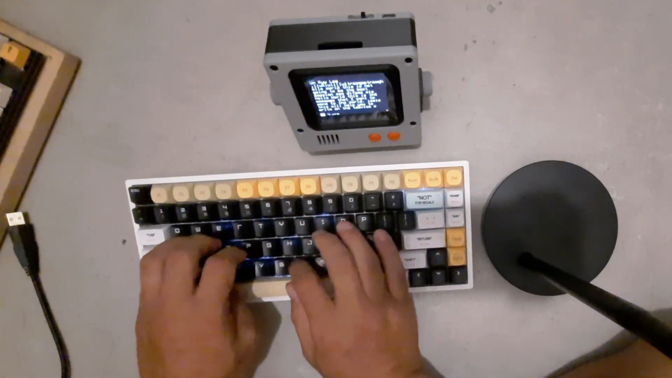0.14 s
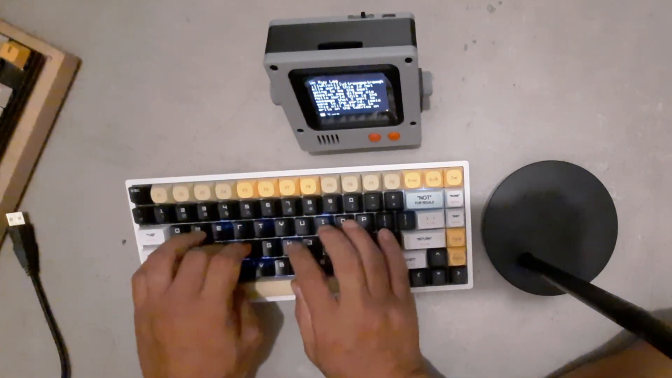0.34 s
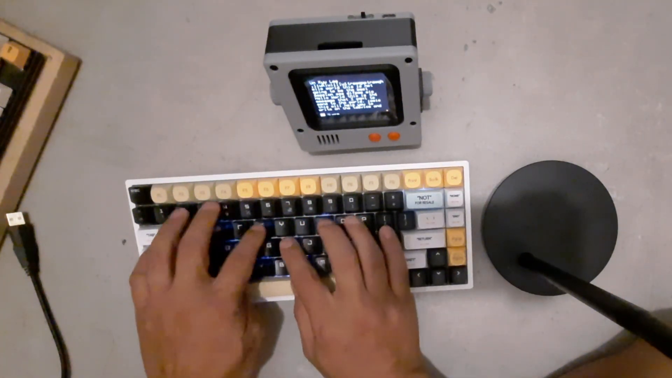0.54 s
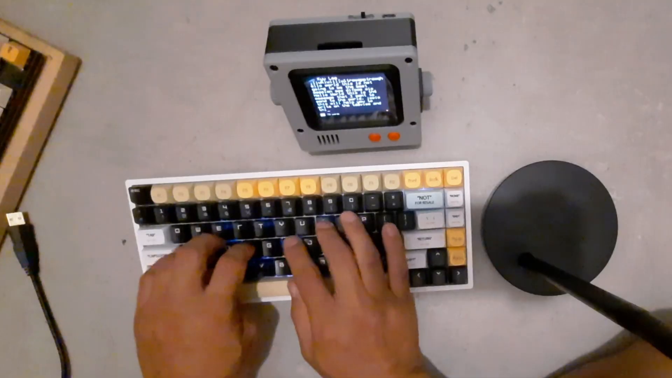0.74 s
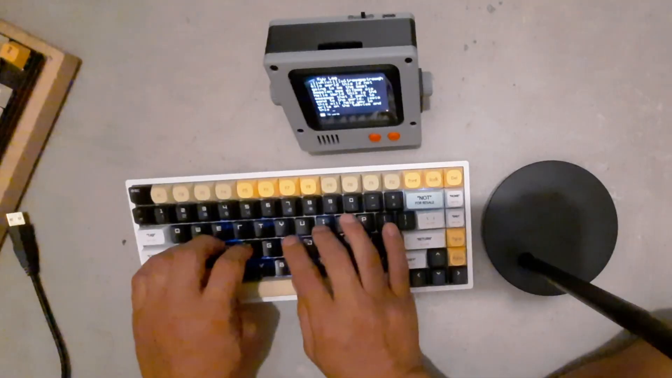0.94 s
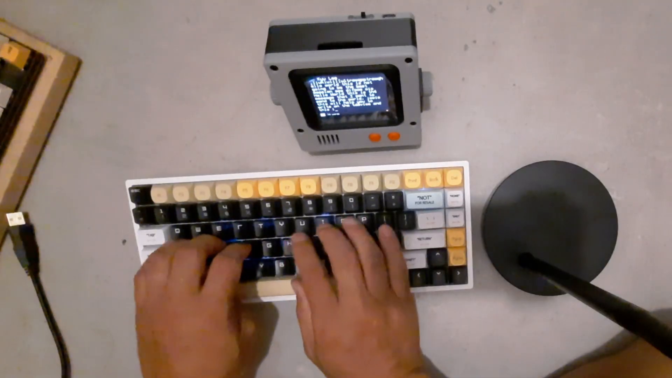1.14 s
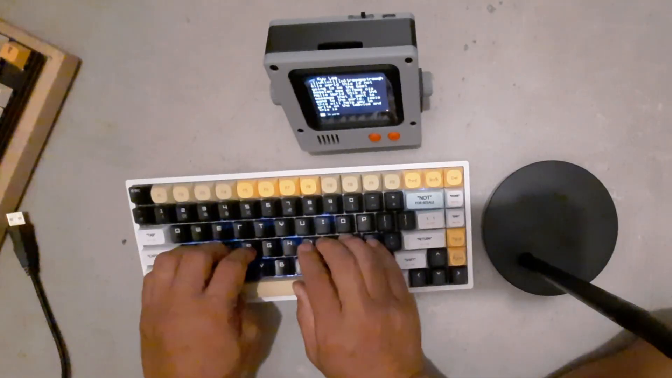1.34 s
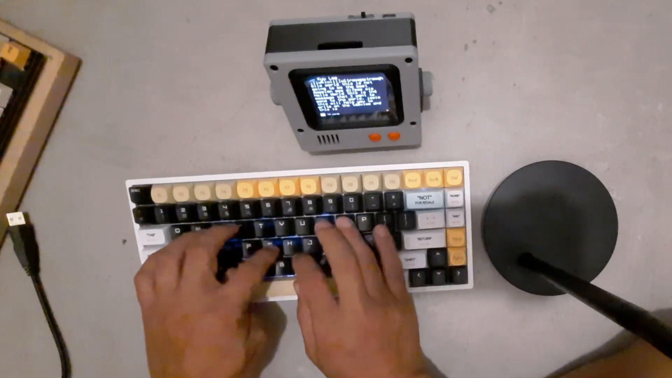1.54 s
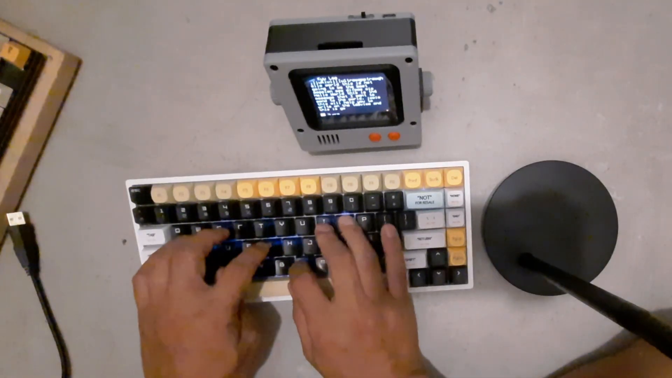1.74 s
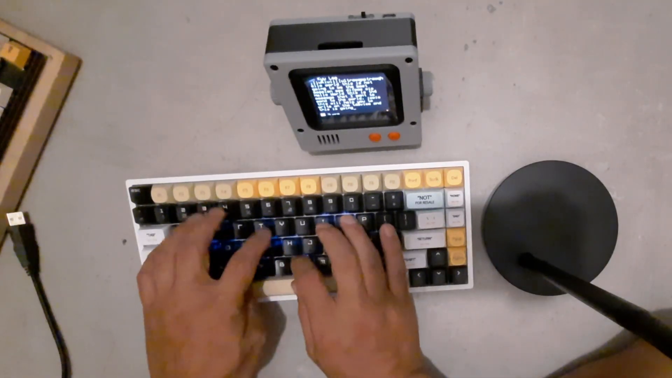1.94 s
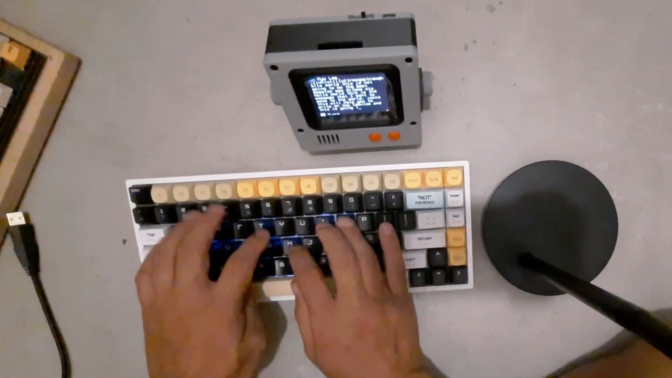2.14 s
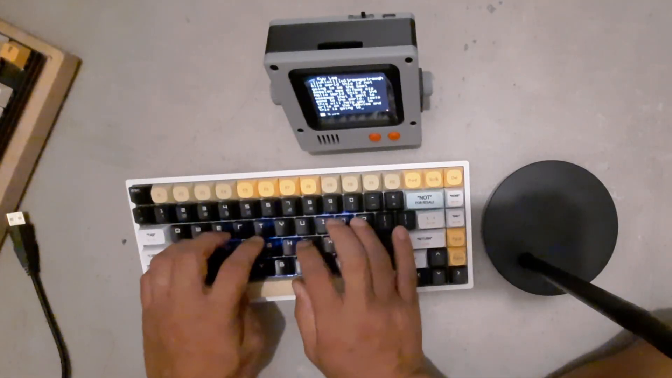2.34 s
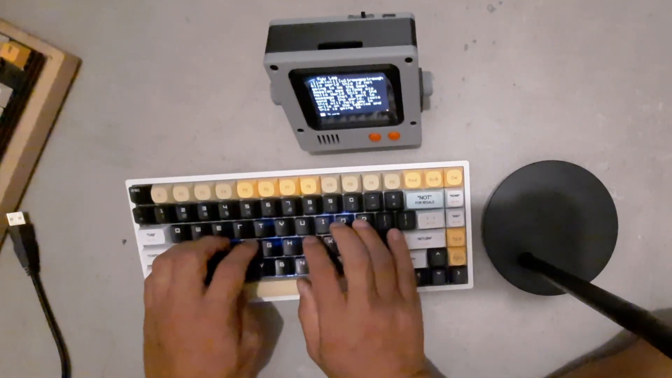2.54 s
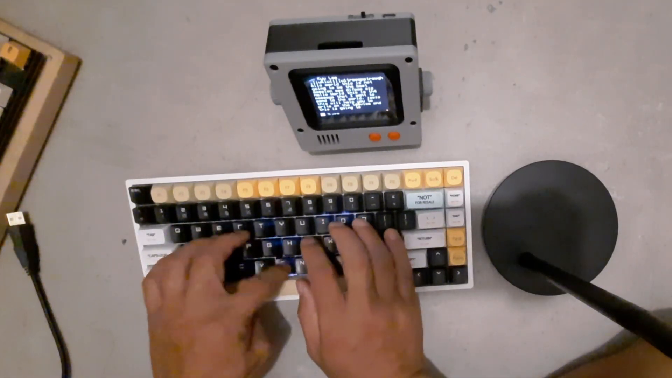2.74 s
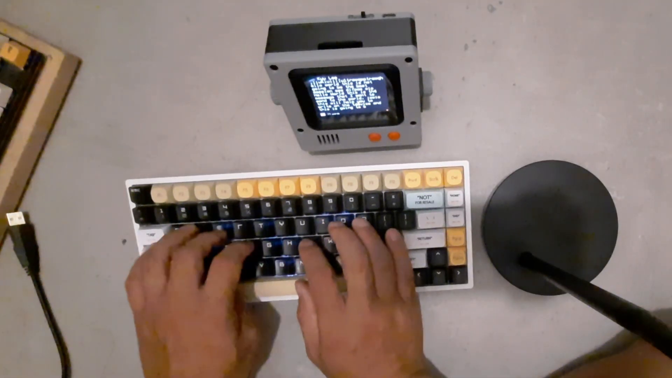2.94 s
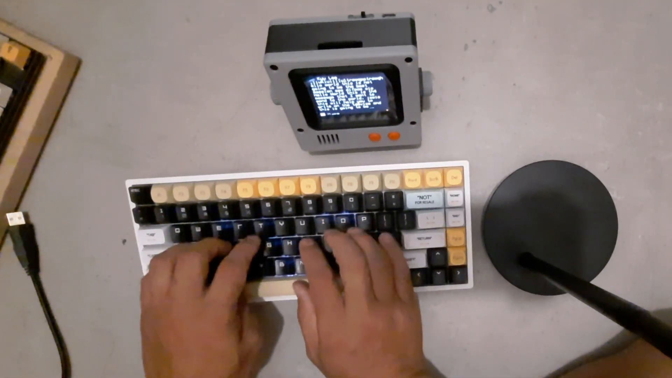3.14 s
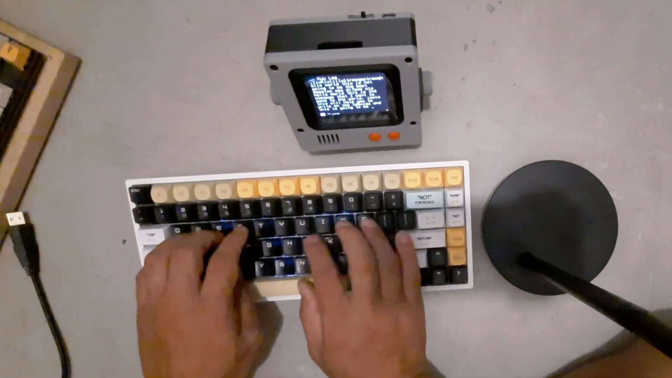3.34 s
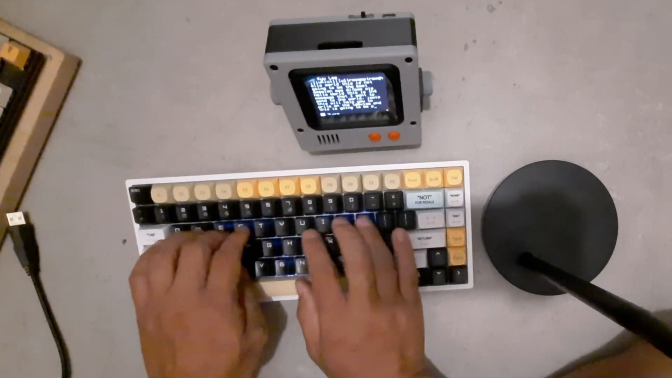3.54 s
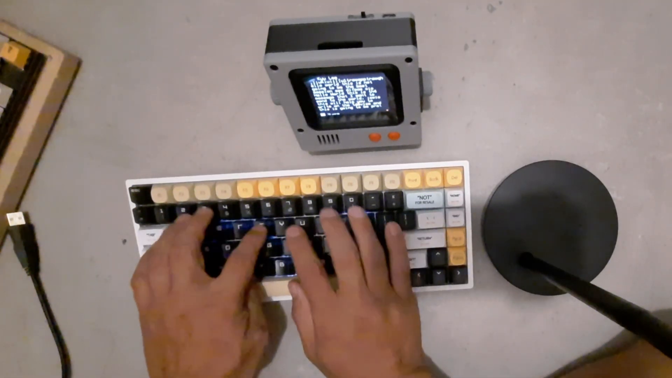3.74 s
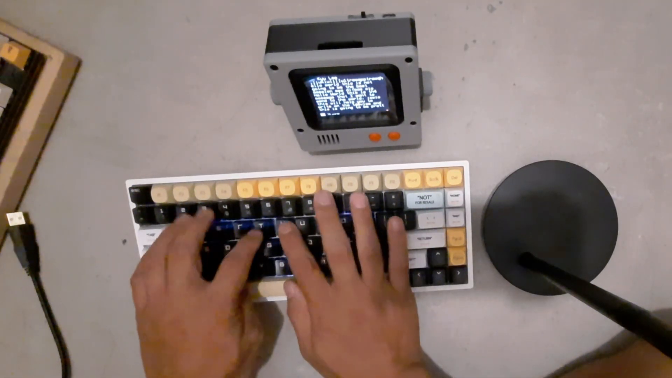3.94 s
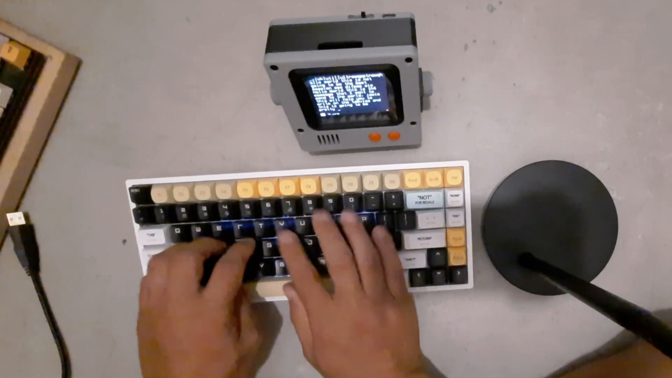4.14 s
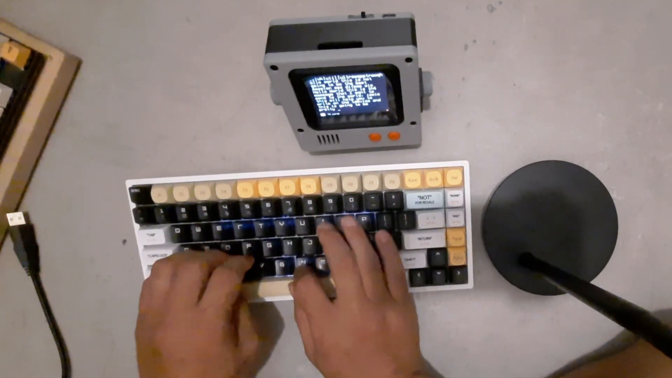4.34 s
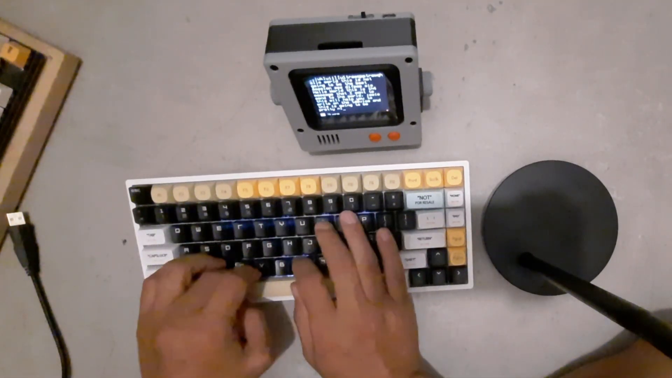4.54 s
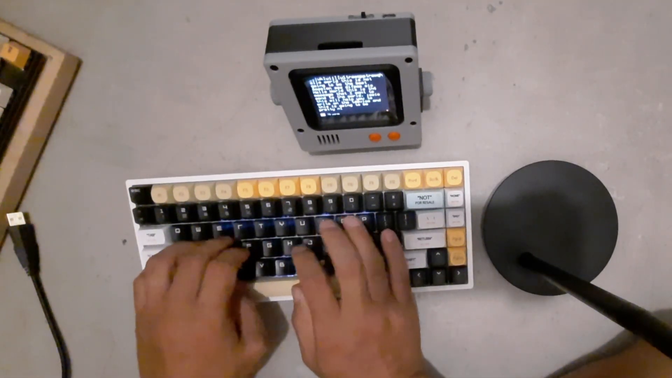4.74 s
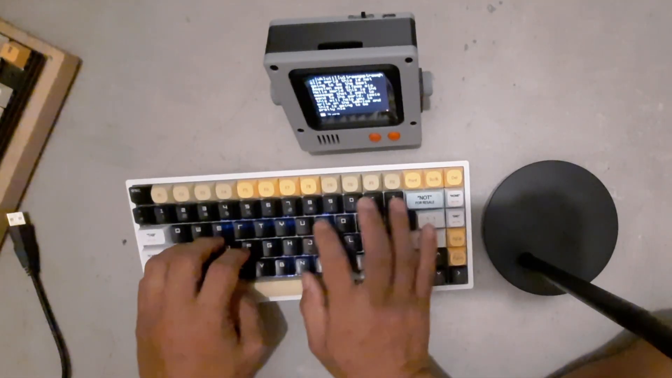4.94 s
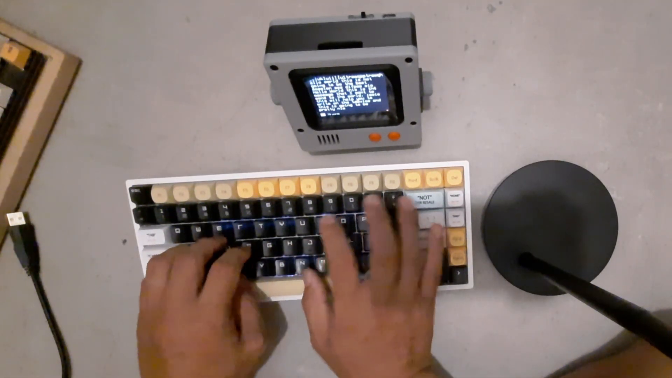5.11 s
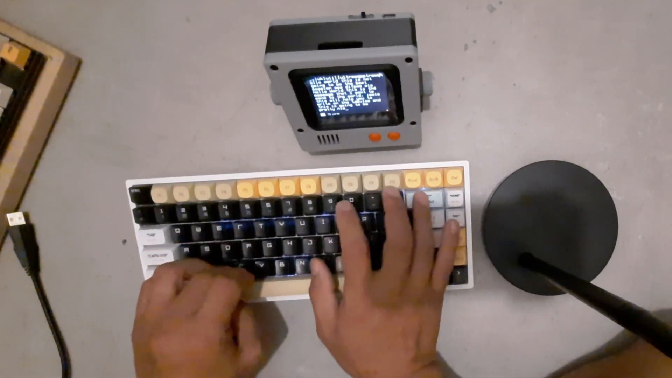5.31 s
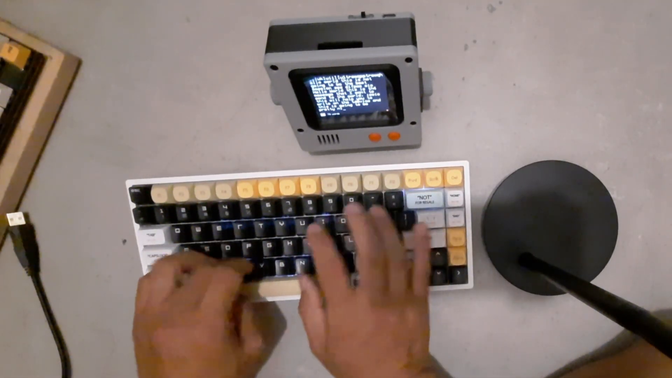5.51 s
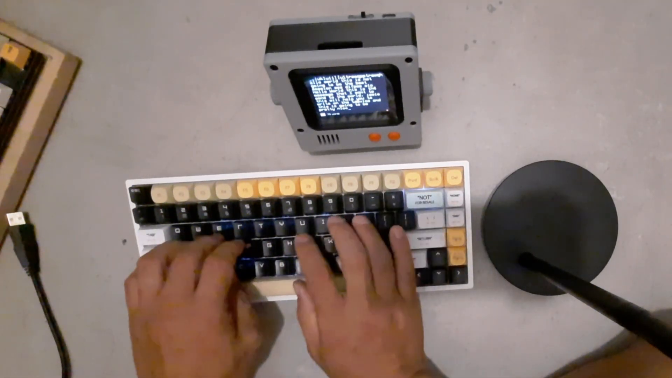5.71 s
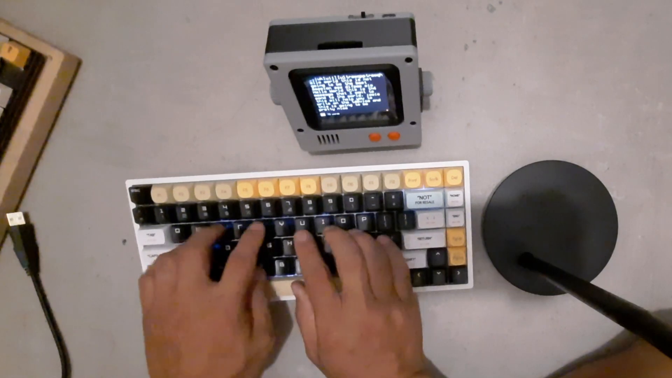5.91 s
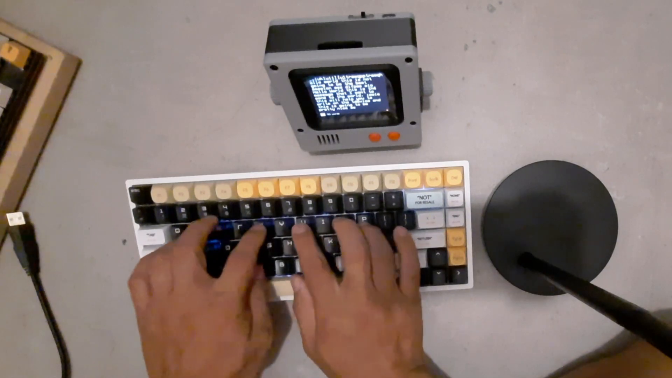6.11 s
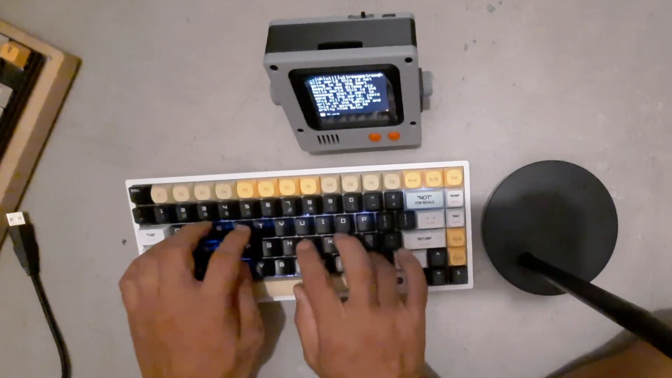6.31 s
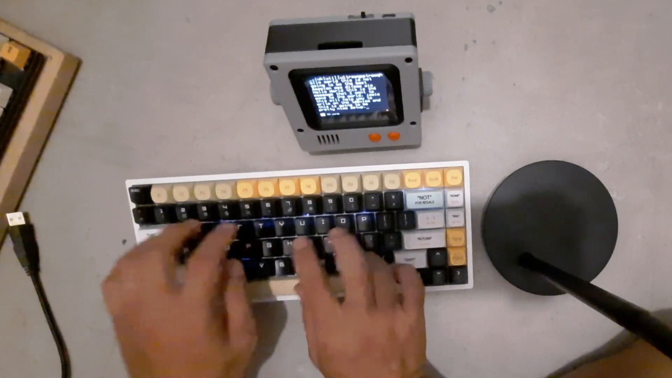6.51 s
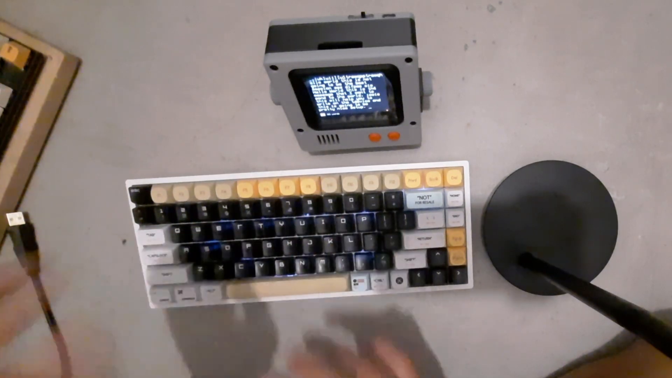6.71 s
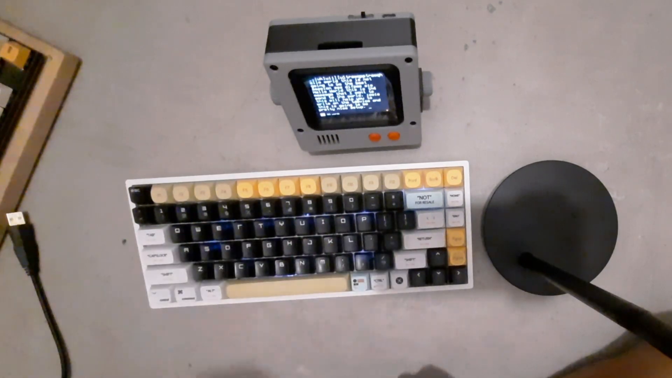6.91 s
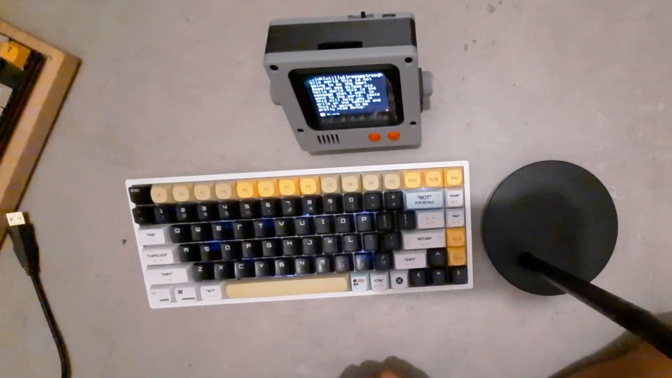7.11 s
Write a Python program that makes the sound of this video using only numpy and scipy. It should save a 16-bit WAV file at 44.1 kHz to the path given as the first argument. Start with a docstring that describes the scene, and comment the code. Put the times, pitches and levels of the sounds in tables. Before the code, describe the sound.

Close, left-leaning stereo sound of quick typing in a quiet, hard-surfaced room. Irregular key presses and releases rattle along, light ticks alternating with full desk-thumping clacks that have a slight metallic ring and a short reverberant tail. Several brief hesitations interrupt the flow, with soft hollow bumps and a barely audible thin squeak. After one last loud stroke only low rumble and soft hiss remain, before a small treble snap.

```python
"""Fast typing on a mechanical keyboard on a hard desk runs through most of the scene, in a bare, quiet room over
faint rumble and hiss. Each key contact is a noise burst of a few milliseconds that excites the resonances of desk,
case, plate and cap; the room answers with a long tail of decaying noise. Amid the typing a thin high squeak, a
wavering frequency sweep, sounds twice, and dull knocks ring hollow modes; a small bright click ends the scene.
The left microphone port is the louder."""
import sys
import numpy as np
from scipy import signal
from scipy.fft import rfft, irfft, next_fast_len
from scipy.io import wavfile
from scipy.ndimage import uniform_filter1d

SR = 44100
rng = np.random.default_rng(int(sys.argv[2]) if len(sys.argv) > 2 else 0)


def master_out(mix):
    """Clip the mix to full scale and print it as 16-bit PCM to the path in sys.argv[1]."""
    frames = np.transpose(np.atleast_2d(mix))
    ceiling = np.clip(frames, -1, 1)
    pcm = np.round(ceiling * 32767).astype(np.int16)
    wavfile.write(sys.argv[1], SR, pcm)


N = 320161  # length in samples

# Key contacts. Each row: start in seconds, reference level in dB, weight from 0 (light small key) to 1 (long key),
# then, relative to the blow, sharpness of the snap in dB and ring of plate and wire in dB.
KEYS = [(.002, -32.5, 0.77, -6.5, -2), (0.0165, -24, 0.74, -13.5, -2), (0.1172, -31, .9, -11.5, -2.5),
        (.1456, -35, 0.3, -4, -2), (0.238, -40.5, 0, -8, -18.5), (0.2495, -31.5, 0.06, -4.5, -1),
        (0.3427, -31, .35, -7, -7), (0.3532, -30, 0.02, -5.5, -3.5), (0.4473, -28, 0.87, -12.5, -3.5),
        (0.4502, -33, 0.9, -28, -0.5), (.562, -31, 0.88, -10.5, -4), (0.5717, -31.5, 0, -2, 1.5),
        (0.6516, -27.5, 0.27, -6, -9), (0.6552, -37, .2, -4.5, -13), (0.7406, -32, 0.18, -2.5, 0.5),
        (0.7953, -31, 0.3, -10.5, -16), (0.8134, -33.5, 0, -7, -3.5), (0.8555, -35.5, 0.5, -9, -11),
        (0.8976, -34.5, 0.26, -3.5, -7), (0.9243, -27.5, 0.92, -14.5, 1), (0.9893, -34.5, 0.55, -9, -22),
        (1.0163, -36.5, 0.3, -2.5, -2), (1.0469, -25.5, 0.84, -12.5, -6), (1.0803, -39, 0.1, -10, -19),
        (1.0968, -29.5, 0, -6.5, -7), (1.1176, -32, 0.48, -2.5, -8), (1.1854, -32, 0.4, -7.5, -7),
        (1.225, -26.5, 0.77, -15.5, -4.5), (1.3099, -28.5, 0.89, -12.5, -3), (1.5554, -41, 0.53, -10, -17),
        (1.5762, -33, 0.07, -6.5, -10), (1.6516, -30.5, 0.42, -5, -9.5), (1.714, -36, 0.4, -5.5, -4),
        (1.7636, -45.5, 0.3, -8, -2.5), (1.7873, -33, 0, -5, -8.5), (1.8604, -37.5, 0.56, -5, -4.5),
        (1.897, -29, 0, -3.5, -9.5), (1.923, -36, 0.34, -13, -2.5), (1.9755, -32, 0.5, -10.5, -5),
        (1.9974, -24.5, 0.81, -15, -2), (2.0929, -29, 0.94, -10, 0), (2.106, -27.5, 0, -3.5, -4),
        (2.1849, -30.5, 0.3, -1.5, -1), (2.1984, -36, 0.15, -6.5, -4), (2.271, -26.5, 0.79, -18, -6.5),
        (2.2938, -41, 0.7, 1, 2), (2.374, -30, 0.81, -13, -3.5), (2.7954, -42.5, 0.66, -12, -8.5),
        (2.873, -36.5, 0.55, -4.5, 0.5), (2.9396, -39, 0.64, -7, -28), (2.957, -30, 0.42, -6, -0.5),
        (3.0432, -36, 0.8, -1.5, -10), (3.0671, -25, 0.82, -13, -2.5), (3.1684, -29, 0.96, -13, -6),
        (3.4432, -58, .95, -8, -25), (3.463, -47, 0, -23, -17), (3.499, -42.5, 0.7, -13, -10),
        (3.5173, -31, 0.25, -7, -6), (3.5616, -33.5, 0.57, -2.5, -14), (3.6105, -30, 0.44, -9.5, -3),
        (3.639, -35.5, 0.44, -7.5, -10), (3.685, -31.5, 0.38, -6, -14.5), (3.7864, -35.5, 0, -4.5, -4.5),
        (3.8502, -35.5, 0.23, -8, -7), (3.9301, -30.5, 0, -6.5, -11.5), (3.9948, -32.5, 0.3, -8, -4.5),
        (4.0886, -42, 0.6, -22, -22.5), (4.1043, -25, 0.82, -15, -0.5), (4.2, -26, 0.86, -10, -0.5),
        (4.3783, -39, 0.04, -10, -6), (4.4043, -30.5, 0.24, -6.5, -3.5), (4.5047, -32, 0.14, -3.5, 1),
        (4.5523, -39, 0.2, -6, -23), (4.5638, -28.5, 0.64, -13, -7.5), (4.6154, -38, 1, -11.5, -10),
        (4.6477, -34, 0.78, -5, -6.5), (4.7484, -46, 0.06, -14, -29), (4.8313, -40, 0.36, -5.5, -1.5),
        (5.3163, -27, 0.66, -14.5, -9), (5.425, -29, 0.94, -8.5, -14), (5.476, -36, 0.03, -8.5, -5.5),
        (5.6003, -37.5, 0.76, -16, -9), (5.6103, -43.5, 0.54, -1, -5), (5.6901, -32.5, 0, -3.5, -0.5),
        (5.7959, -35.5, 0.74, -4.5, -8.5), (5.808, -26, 0.76, -12.5, -1), (5.9138, -28.5, 0.88, -12, -3),
        (5.953, -37, 0, -6, -12), (6.002, -49, 1, 1.5, -11), (6.0161, -26.5, 0.35, -7, 0),
        (6.057, -33.5, 0.65, -4, -13), (6.0754, -28.5, 0, -3, -7), (6.114, -30.5, 0.35, -5.5, -4.5),
        (6.1337, -31.5, 0.19, 0, -5), (6.181, -35.5, 0.48, -22, -5.5), (6.2763, -36, 0.4, -5.5, -7),
        (6.3059, -35, 0.55, -8.5, -14), (6.4171, -45, 0.77, -3, -7), (6.4406, -44.5, 0, -21.5, -8.5),
        (6.526, -26, 0.88, -11.5, 2), (6.5443, -50, 0.9, 14, -3.5), (6.6086, -21.5, 0.89, -6, 6.5)]

# Resonances of the keyboard parts. Each row: centre in Hz, width in Hz, relative strength in dB.
CASE = [(1796, 130, 9.5), (1992, 253, 9), (2260, 200, -1)]
CASE_LOW = [(968, 184, -6.5), (1326, 386, 3), (1586, 490, 7.5)]
DESK = [(155, 47, -13.5), (312, 86, -7.5), (384.3, 120, -7.5), (479.6, 80, -2.5), (563.5, 77, -0.5),
        (799, 200, -0.5)]
PLATE = [(2715, 940, 0.0058), (2880, 610, 0.0089)]
WIRE = [(3140, 100, 0), (5280, 700, -31)]  # the steel wire under the long keys
CAP = [(3440, 730, 11.5), (4080, 730, 2), (4730, 1100, -8)]
STEM = [(5550, 2600, 7.5), (7450, 2660, 8), (11600, 710, -12.5), (13300, 2800, -8.5), (15200, 7500, -15)]
SPRING = [(8280, 1100, 0)]  # the loose rattle of the switches

# How strongly each part answers, relative to its drive: (light key dB, long key dB).
CASE_MIX, CASE_LOW_MIX, DESK_MIX = (-2, -7.5), (-5.5, -6.5), (-48.5, -17.5)  # to the blow
WIRE_MIX, PLATE_MIX = (-31.5, 0.85), (0, -0.5)  # to the ring
CAP_MIX, STEM_MIX, SPRING_MIX = (2.6, -7.5), (-10.5, -6), (-11.5, -12)  # to the snap

# Spectrum of the room rumble. Each row: frequency in Hz, relative density in dB per Hz.
RUMBLE_COLOUR = [(12, -49), (20, -18.5), (85, -6), (238, -18), (280, -9.5), (455, -20), (498, -18),
                 (555, -22.5), (1500, -28), (1950, -35), (3300, -120)]
# Slow swelling of the rumble above 250 Hz. Each row: time in seconds, extra level in dB.
RUMBLE_SWELL = [(0, 5), (1.3, 0), (2.6, 5.5), (3.2, 5.5), (3.5, -2.5), (4.4, -1.5), (5.1, 0), (6.6, -3),
                (7.26, -2)]
# Spectrum of the microphone hiss. Each row: frequency in Hz, relative density in dB per Hz.
HISS_COLOUR = [(300, -9), (800, -2), (3000, -2.5), (8000, -6.5), (10000, -9.5), (13000, -7), (15600, -6),
               (16000, -13.5)]
# Stereo balance of rumble and hiss. Each row: frequency in Hz, left over right in dB.
AIR_LEAN = [(60, 9), (240, 6), (950, 11.5), (3770, 2.5), (15000, 5)]

# Squeaks. Each row: start in seconds, length in seconds, rise in seconds, pitch in Hz about which the held
# tone drifts, level in dB before the wavering and the stereo gains.
SQUEAKS = [(2.56, .28, .03, 11600, -80), (3.1, .225, .07, 11850, -79)]
SQUEAK_FALL_S, SQUEAK_EDGE_DB = .052, -6
RISE_HZ_PER_S, DRIFT_HZ_PER_S, FALL_HZ = 18000, 3300, 1500
UNDERTONE = .63  # frequency of the companion tone over that of the squeak

# Dull knocks. Each row: start in seconds, level in dB.
KNOCKS = [(3.192, -56), (3.237, -45.5), (3.278, -54), (3.314, -49.5), (3.36, -60.5), (3.438, -58.5)]
# Hollow modes of the knocks. Each row: centre in Hz, width in Hz, relative strength in dB.
HOLLOW = [(306, 170, -7), (537, 115, 1.5), (765, 260, -3.5)]

# Small bright clicks. Each row: start in seconds, level in dB.
CLICKS = [(7.2023, -65.5), (7.229, -40.5)]
# Treble modes of the clicks. Each row: centre in Hz, width in Hz, relative strength in dB.
SNAP = [(2860, 2500, 3.5), (6800, 5200, 12.5), (7180, 1800, 14.5), (12000, 4000, -8)]

# Reverberation time. Each row: frequency in Hz, time to decay by 60 dB in seconds.
ROOM_T60 = [(150, 0.69), (500, 0.38), (1400, 0.35), (1700, 0.5), (2300, 0.46), (2900, 0.55), (3150, 0.55),
            (3500, 0.46), (6000, 0.52), (14000, 0.43)]
# Colour of the reverberation. Each row: frequency in Hz, gain in dB.
ROOM_COLOUR = [(200, -2), (700, 6), (1800, -7), (2500, -9.5), (3100, -12.5), (4000, -7.5), (5300, -5.5),
               (8500, -10), (14000, -5.5)]
# Stereo balance of the reverberation. Each row: frequency in Hz, left over right in dB.
ROOM_LEAN = [(60, 30), (240, 6), (950, 6.5), (3770, 3), (15000, 4)]
# Coherence of diffuse sound. Each row: frequency in Hz, left-right likeness from 0 to 1.
ALIKE = [(60, .1), (300, 0.92), (700, 0.53), (1400, 0.0061), (3000, 0.027)]
# Response of the microphone ports. Each row: frequency in Hz, gain in dB.
MIC = [(20, -8.5), (45, -1.5), (8600, -2.5), (9500, -0.5), (10500, 5.5), (15600, 0.5), (15900, -8)]

TOP_HZ = 16500  # band limit
SHORT, SPAN = 2 ** 12, 2 ** 15  # samples in a contact, and in a contact with its room answer
LEAD = .003  # silence ahead of each contact, s
FLANK = 2.4  # steepness of the resonance flanks (1 = a single mode)


def amp(db):
    """Level law: the amplitude gain of a level in dB."""
    return 10 ** (np.asarray(db) / 20)


def along(points, hz):
    """Interpolation of (Hz, value) points along a logarithmic frequency axis."""
    f, v = np.transpose(points)
    return np.interp(np.log(hz + 1), np.log(f + 1), v)


def spread(pair, lean, hz):
    """Partial coherence: mid and side mixing makes two unrelated spectra partly alike, and louder on one side."""
    turn = np.arccos(np.clip(along(ALIKE, hz), -1, 1)) / 2
    mid, side = pair[0] * np.cos(turn), pair[1] * np.sin(turn)
    half_lean_db = along(lean, hz) / 2
    return np.array([(mid + side) * amp(half_lean_db), (mid - side) * amp(-half_lean_db)])


def rattle(count, rise, fall):
    """Broadband excitation: noisy contacts of unit energy excite all frequencies about evenly; one spectrum a row."""
    t = np.clip(np.arange(SHORT) / SR - LEAD, 0, 1)
    shape = (1 - np.exp(-t / rise)) * np.exp(-(t / fall) ** 4)
    z = rfft(rng.standard_normal((count, SHORT)) * shape)
    smooth_power = uniform_filter1d(np.abs(z) ** 2, size=int(SHORT / SR / fall / 2), axis=1)
    even = irfft(z / np.abs(smooth_power) ** 0.29) * shape ** .5  # partly whitened
    return rfft(even / np.linalg.norm(even, axis=1, keepdims=True))


def rung(modes, db, scatter_db):
    """Modal excitation: power spectra of a part, its mode strengths varying at random from blow to blow.
    db is the rms level that the response would have if its energy filled 10 ms."""
    f = np.fft.rfftfreq(SHORT, 1 / SR)
    shapes = []
    for centre, width, gain_db in modes:
        damping = (f * width) ** 2
        resonance = damping / ((centre * centre - f * f) ** 2 + damping)
        shapes.append(amp(gain_db) ** 2 * resonance ** FLANK)
    strengths = amp(scatter_db * rng.standard_normal((len(db), len(modes)))) ** 2
    power = strengths @ np.array(shapes)
    energy = amp(db) ** 2 * SR / 100
    return power * (energy * SHORT / 2 / power.sum(1))[:, None]


def causal(power):
    """Minimum phase: folding the cepstrum gives the causal response with this power spectrum."""
    cepstrum = irfft(np.log(power + 1e-14) / 2, SHORT)
    cepstrum[:, 1:SHORT // 2] *= 2
    cepstrum[:, SHORT // 2 + 1:] = 0
    return np.exp(rfft(cepstrum))


def tails(count):
    """Reverberant decay: stereo noise in which each frequency dies at its own speed, slightly slower at first."""
    hz, t, z = signal.stft(rng.standard_normal((2, count, SPAN)), SR, nperseg=512)
    decay = amp(-60 * (t / along(ROOM_T60, hz)[:, None]) ** 1.08)
    tail = signal.istft(z * decay, SR, nperseg=512)[1][..., :SPAN]
    # the first walls arrive after a few ms
    tail = tail * np.clip((np.arange(SPAN) / SR - LEAD - .003) / 0.0015, 0, 1)
    f = np.fft.rfftfreq(SPAN, 1 / SR)
    even = rfft(tail / np.sqrt(np.mean(np.sum(tail ** 2, -1))))  # unit mean energy before lean and colour
    return spread(even, ROOM_LEAN, f) * amp(along(ROOM_COLOUR, f))


def placed(times, body, blows, room, right_db, wet_db, lag):
    """Direct, reflected and diffuse sound: the right port hears it later (lag in s) and weaker, then a near wall
    returns it dulled. The room collects sound sent in all directions, so it carries the even colour of the body."""
    f = np.fft.rfftfreq(SPAN, 1 / SR)
    direct, radiated = rfft(irfft(body * blows), SPAN), rfft(irfft(body), SPAN)
    other = rfft(irfft(body * np.roll(blows, shift=1, axis=0)), SPAN)
    # in the treble the right port hears another side of the rattle
    turn = np.clip(f / 12000, 0, 1) * np.pi / 2
    far_side = np.cos(turn) * direct + np.sin(turn) * other
    right = amp(right_db) * np.exp(-2j * np.pi * f * lag) * far_side
    wall_delay = np.exp(-2j * np.pi * f * [[.0078], [.0074]])  # left and right, s
    wall = amp([[-14], [-16]]) * wall_delay / (1 + 1j * f / 4000)
    diffuse = amp(wet_db) * radiated * room[:, np.arange(len(times)) % room.shape[1]]
    sounds = irfft(np.array([direct, right]) + wall[:, None] * other + diffuse, SPAN)
    out, lead = np.zeros((2, N + 2 * SPAN)), round((LEAD + .0006) * SR)
    for k, s in enumerate(times):
        out[:, round(s * SR):][:, :SPAN] += sounds[:, k]
    return out[:, lead:lead + N]


def keyboard(room):
    """Coupled resonators: one rattle per contact, as a key bottoms out or snaps back, rings all the parts together.
    Heavy keys thump the desk and ring their wire; sharp ones tick."""
    s, blow_db, weight, sharp_db, ring_db = np.transpose(KEYS)
    weight = np.clip(weight, 0, 1)

    def mix(light_db, heavy_db):
        """Linear interpolation in dB from light to long keys, on top of the blow."""
        return blow_db + light_db + (heavy_db - light_db) * weight

    power = rung(CASE, mix(*CASE_MIX), scatter_db=3.5)
    power += rung(CASE_LOW, mix(*CASE_LOW_MIX), scatter_db=5)
    power += rung(DESK, mix(*DESK_MIX), scatter_db=2.5)
    power += rung(PLATE, mix(*PLATE_MIX) + ring_db, scatter_db=0.5)
    power += rung(WIRE, mix(*WIRE_MIX) + ring_db, scatter_db=4)
    power += rung(CAP, mix(*CAP_MIX) + sharp_db, scatter_db=5)
    power += rung(STEM, mix(*STEM_MIX) + sharp_db, scatter_db=3.5)
    power += rung(SPRING, mix(*SPRING_MIX) + sharp_db, scatter_db=1)
    blows = rattle(count=len(s), rise=0.000072, fall=0.0042)
    return placed(s, causal(power), blows, room, right_db=-10.5, wet_db=1, lag=0.00018)


def air():
    """Stationary noise: filtered low rumble, its upper part swelling slowly, over a steady hiss."""
    m = next_fast_len(N)
    f = np.fft.rfftfreq(m, 1 / SR)

    def noise():
        """White noise, made partly coherent between the ports and leaning to one side."""
        return spread(rfft(rng.standard_normal((2, m))), AIR_LEAN, f)

    rumble = noise() * amp(along(RUMBLE_COLOUR, f))
    low = irfft(rumble * (f < 250), m)[:, :N]
    high = irfft(rumble * (f >= 250), m)[:, :N]
    hiss = irfft(noise() * amp(along(HISS_COLOUR, f)), m)[:, :N]
    swell_db = np.interp(np.arange(N) / SR, *np.transpose(RUMBLE_SWELL))
    swelling = low + high * amp(swell_db)
    return swelling / np.std(low) * amp(-77) + amp(-80.5) * hiss / np.std(hiss)


def squeak():
    """Frequency modulation: a whistle rises, drifts up and drops, wavering, with a fainter companion tone below."""
    t, out = np.arange(N) / SR, np.zeros(N)
    # smoothed noise of unit rms, for pitch and for level
    waver = uniform_filter1d(rng.standard_normal((2, N)), 200, axis=1) * np.sqrt(200)
    for s, length, rise, hz, db in SQUEAKS:
        rising = np.clip(1 - (t - s) / rise, 0, 1)
        falling = np.clip(1 - (s + length - t) / SQUEAK_FALL_S, 0, 1)
        drift = DRIFT_HZ_PER_S * (t - s - length / 2)
        pitch = hz + drift - RISE_HZ_PER_S * rise * rising - FALL_HZ * falling
        phase = 2 * np.pi * np.cumsum(pitch * (1 + 0.0063 * waver[0])) / SR
        level_db = db + SQUEAK_EDGE_DB * (rising + falling) + 4.2 * waver[1]
        level = amp(level_db) * (t > s) * (t < s + length)
        out += level * (np.sin(phase) + amp(-15.5) * np.sin(UNDERTONE * phase))
    return out * amp([[4], [-3]])  # left, right


def knocks(room):
    """Soft impact: a slower contact excites a few low modes, heard as dull blows with a hollow note."""
    s, db = np.transpose(KNOCKS)
    body = causal(rung(HOLLOW, db, scatter_db=2.5))
    blows = rattle(count=len(s), rise=0.0054, fall=0.01)
    return placed(s, body, blows, room, right_db=-6.5, wet_db=-8, lag=.0001)


def clicks(room):
    """Hard impact: small plastic snaps excite broad modes, nearly all in the treble."""
    s, db = np.transpose(CLICKS)
    body = causal(rung(SNAP, db, scatter_db=3))
    blows = rattle(count=len(s), rise=0.0015, fall=0.0049)
    return placed(s, body, blows, room, right_db=-7, wet_db=1, lag=0.00013)


def scene():
    """Superposition: everything that reaches the two ports adds, the contacts sharing one set of room answers."""
    room = tails(count=12)
    return keyboard(room) + air() + squeak() + knocks(room) + clicks(room)


def record(dry):
    """Linear filtering: the ports colour the sound, and nothing is kept above the band limit."""
    m = next_fast_len(N + 4096)
    f = np.fft.rfftfreq(m, 1 / SR)
    return irfft(rfft(dry, m) * amp(along(MIC, f)) * (f < TOP_HZ), m)[:, :N]


dry = scene()
out = record(dry)
master_out(out)
```